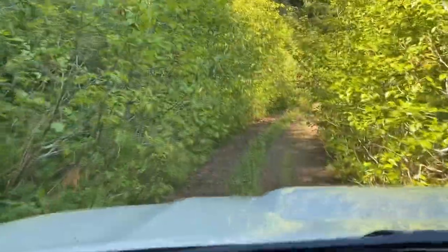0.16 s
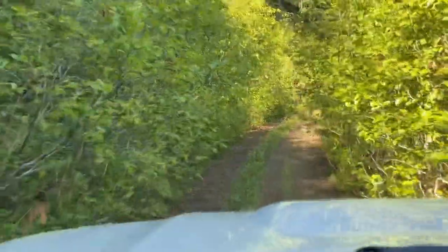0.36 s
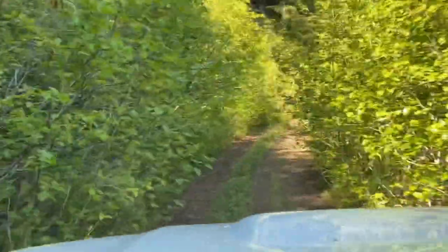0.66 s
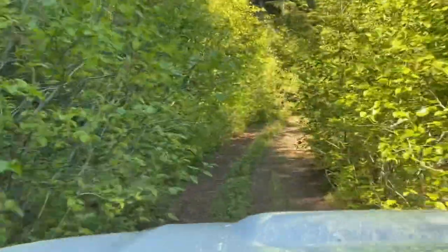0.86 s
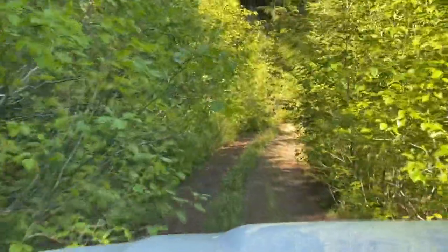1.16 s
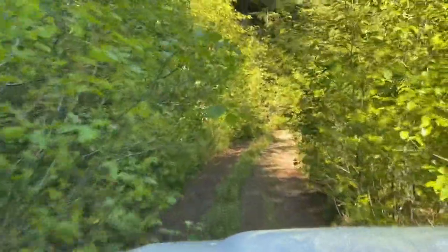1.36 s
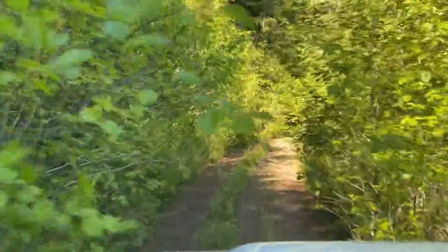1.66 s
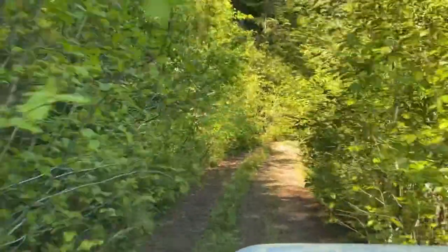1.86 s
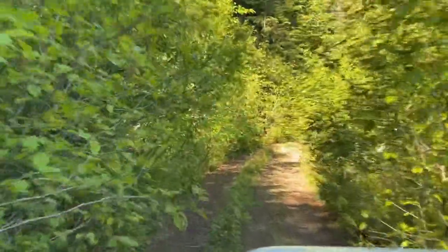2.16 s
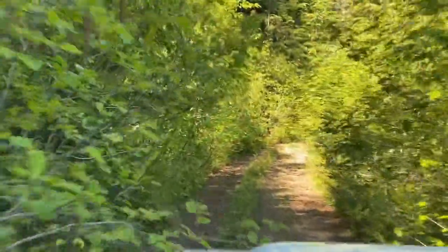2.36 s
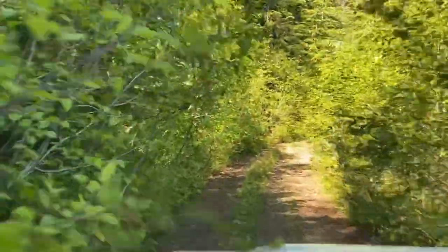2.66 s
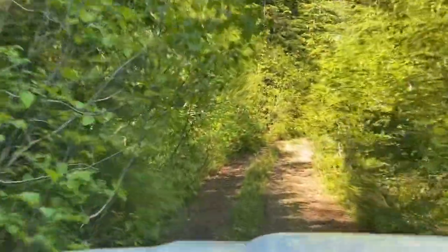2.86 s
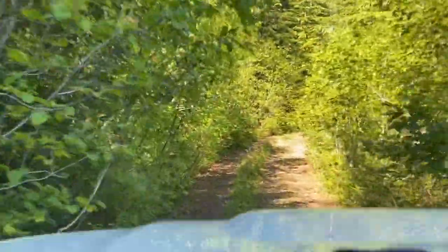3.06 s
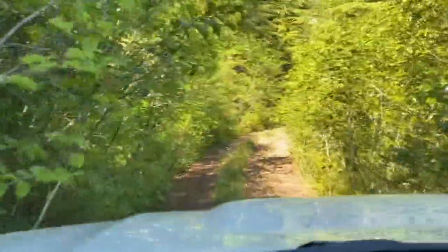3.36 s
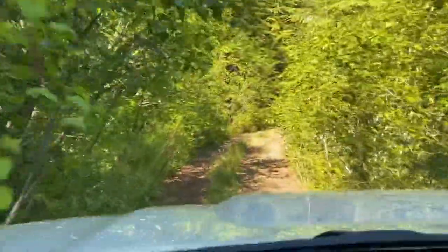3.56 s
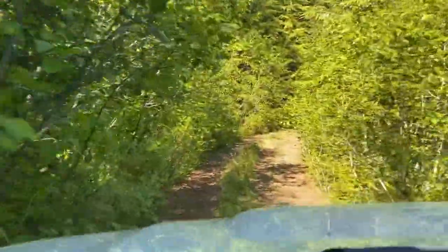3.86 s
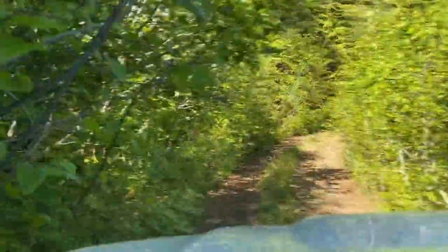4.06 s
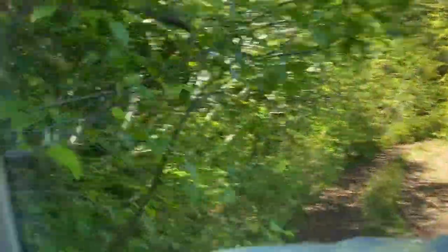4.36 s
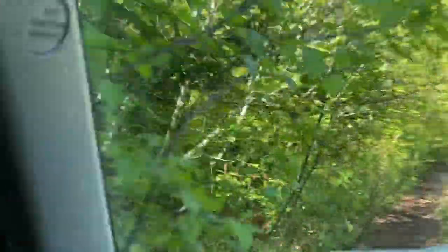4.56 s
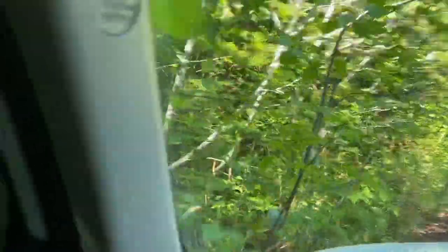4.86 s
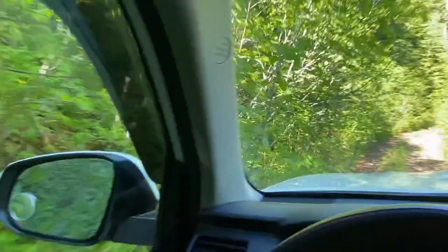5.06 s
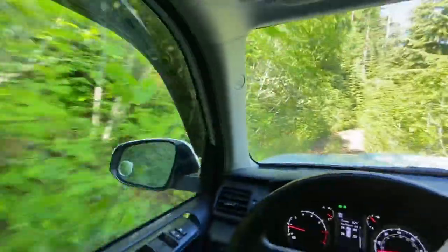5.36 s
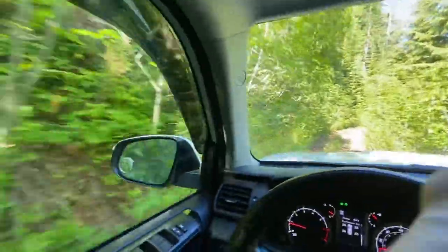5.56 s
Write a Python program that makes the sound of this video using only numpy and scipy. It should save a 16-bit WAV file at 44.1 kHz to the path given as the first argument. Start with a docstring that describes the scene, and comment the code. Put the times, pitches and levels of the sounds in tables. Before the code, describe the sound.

Low booming cab rumble over ruts, quiet engine hum, branches rustling, ticking and knocking on the bodywork, one hard thump late on.

```python
"""A deep, uneven cab boom and dull gravel crunch over a quiet engine, with leaf rustle, twig slaps and knocks.
A four-wheel-drive crawls along an overgrown dirt track, heard from the driver's seat.
Filtered noise makes the tyre rumble, wash and twig contacts; tiny random impacts make stones and foliage;
sine waves make the engine, ruts and ringing body. Near the end the microphone turns to the side window."""
import sys
import numpy as np
from scipy import signal
from scipy.fft import rfft, irfft, next_fast_len
from scipy.io import wavfile
from scipy.ndimage import uniform_filter1d

SR = 44100
rng = np.random.default_rng(int(sys.argv[2]) if len(sys.argv) > 2 else 0)


def generate_wav(sig):
    """Save sig (samples, or channels by samples) to the path in sys.argv[1] as 16-bit PCM at SR."""
    pcm = np.round(np.clip(np.atleast_2d(sig).T, -1, 1) * 32767).astype(np.int16)
    wavfile.write(sys.argv[1], SR, pcm)


N = 251366
FFT_SIZE = next_fast_len(N, True)
BINS = np.fft.rfftfreq(FFT_SIZE, 1 / SR)  # Hz

# Foliage pressing on the body, before layer trims: t/s, stems rubbing level/dB, leaves rustling level/dB
FOLIAGE_PRESSURE = [(0.0, -54, -58), (0.2, -57, -64), (0.4, -45, -53.5), (0.58, -53.5, -65),
                    (0.98, -44.5, -58), (1.64, -49, -68.5), (1.93, -45, -58), (2.37, -56, -48.5),
                    (2.85, -43, -56), (3.0, -51.5, -58), (3.3, -40.5, -53.5), (3.55, -49, -63),
                    (4.0, -45.5, -54), (4.58, -58, -67.5), (4.77, -41, -64.5), (4.99, -53, -77.5),
                    (5.18, -47, -63.5), (5.7, -50, -53.5)]


# In every two-channel source, row 0 is common to both microphone ports and row 1 is what sets them apart.

def tyres(boom_db=1, drum_db=-1, lumpy_db=4.0, heave_db=1.0):
    """The ground shakes the cab through the springs in uneven heaves; stones crunch dully under the tread."""
    # Roughness of the track, before layer trims: t/s, cab boom level/dB, tyre drumming level/dB, gravel level/dB
    ground = [(0.0, -26, -34, -51.5), (0.22, -29, -34, -50.5), (0.55, -27, -32, -39.5),
              (0.75, -30, -38, -42), (1.05, -27.5, -32, -40.5), (1.25, -28.5, -29, -40.5),
              (1.8, -27.5, -32, -38), (2.25, -26.5, -36, -44), (2.45, -30.5, -33.5, -44),
              (2.85, -28, -33, -35), (3.2, -26, -30.5, -45.5), (3.55, -26.5, -37, -45.5),
              (4.05, -28, -30, -32.5), (4.68, -31.5, -34.5, -39), (4.85, -23, -25, -46),
              (5.14, -30.5, -35.5, -39), (5.4, -26.5, -30, -42.5), (5.7, -28, -28.5, -38.5)]
    # Spectrum of the cab boom: f/Hz, relative level per Hz/dB
    boom_spectrum = [(10, -35), (24, -10.5), (33, 2.5), (40, -1), (47, 4.5), (55, 6), (67, 4), (80, -9),
                     (100, -42.5), (200, -82)]
    # Spectrum of the tyre drumming: f/Hz, relative level per Hz/dB
    drum_spectrum = [(40, -35), (65, -15), (80, 7), (97, 1), (114, -5), (135, -0.5), (170, -4.5),
                     (210, -23), (330, -23), (600, -97)]
    # Spectrum of the gravel: f/Hz, relative level per Hz/dB
    gravel_spectrum = [(100, 3.5), (190, 1), (235, 0.5), (275, 5), (345, -0.5), (440, -5), (620, -9),
                       (800, -14.5), (1400, -22.5), (4000, -47)]
    heave = gain_of(heave_db * wander(rate_hz=9.9))
    boom = gain_of(boom_db) * level(ground, axis=1) * rumble(boom_spectrum, steady_s=0.048)
    drum = gain_of(drum_db) * level(ground, axis=2) * rumble(drum_spectrum, steady_s=0.084)
    lumps = gain_of(lumpy_db * wander(rate_hz=6.6))
    stones = colour(cab(grains(per_s=450, spread_db=4), wet_db=-14), gravel_spectrum)
    return heave * (boom + drum) + lumps * level(ground, axis=3) * stones


def rumble(spectrum, steady_s):
    """Random shaking in one band, with its slow swells evened out."""
    x = colour(rng.standard_normal((2, N)), spectrum)
    size = max(int(steady_s * SR), 1)
    power = uniform_filter1d(uniform_filter1d(x ** 2, size), size)
    return x / np.sqrt(abs(power) + 1e-6)


def ruts(skew=0.5, stray=0.089, stray_hz=22.12):
    """A wheel drops into a rut and climbs out: cab and tyre boom for a few cycles, at an unsteady pitch."""
    # Ruts: t/s, length/s, cab boom level/dB, boom f/Hz, tyre drumming level/dB, drumming f/Hz
    rut_rows = [(0.284, 0.18, -20, 57.4, -37, 137), (0.412, 0.13, -17, 53.4, -27.5, 120.7),
                (1.134, 0.12, -24.5, 44.8, -35, 113.5), (1.328, 0.1, -23, 45, -29.5, 98),
                (2.578, 0.11, -28, 66.4, -29, 112.6), (2.869, 0.071, -39, 49, -31, 94),
                (3.05, 0.14, -23, 62.8, -31, 99), (3.617, 0.14, -32, 64.8, -29.5, 143.7),
                (3.85, 0.11, -18, 50, -31, 88.4), (4.251, 0.085, -16, 44.7, -17, 102.5),
                (4.387, 0.2, -15.5, 48.2, -24.5, 105.7), (4.873, 0.063, -20, 62.4, -17, 91.6),
                (4.902, 0.04, -36, 50, -10, 103), (5.419, 0.19, -17, 46.5, -26.5, 79)]
    # Two unsteady clocks make the boom and the drumming stray in pitch separately.
    clocks = [np.cumsum(1 + stray * wander(stray_hz)) / SR for _ in range(2)]
    out = np.zeros(N)
    for s, length, boom_db, boom_hz, drum_db, drum_hz in rut_rows:
        part = slice(round(s * SR), round((s + length) * SR))
        push = arch(s, length, skew)[part]  # skew under 1: the drop is quicker than the climb
        for clock, db, hz in zip(clocks, (boom_db, drum_db), (boom_hz, drum_hz)):
            turns = hz * (clock[part] - clock[part][0]) + rng.random()
            out[part] += gain_of(db) * push * np.sqrt(2) * np.sin(2 * np.pi * turns)
    return out * np.array([[1], [0]])


def knocks(knock_db=-1, rise_cycles=0.4, rattle=0.19, apart_db=-4, apart_turns=0.22,
           trim_db=-2.0, trim_t60=0.15, lowest_db=-15, detune=0.035, size=16384):
    """Bumps and thick branches swell each body mode within about a cycle; loose trim clatters along."""
    # Blows: t/s, level before trims/dB, panel drum relative level/dB, ring length factor, clack relative level/dB
    blows = [(0.286, -24.5, -14, 2.1, -16.5), (0.344, -33, -14, 0.95, -24), (0.417, -36, -7, 0.51, -9),
             (0.432, -16, -8, 0.47, -22), (1.164, -35, 9.5, 0.35, -11), (1.969, -22, 5, 0.84, -18),
             (2.605, -16.5, -0.5, 0.74, -16), (2.721, -25.5, -6, 0.38, -8), (2.817, -26.5, -12, 0.58, -10),
             (3.053, -21, -0.5, 0.4, -17), (3.232, -29.5, -1, 0.59, -11), (3.375, -24, -6, 0.51, -14),
             (3.612, -36.5, 6, 2.2, -12), (3.712, -31, -4, 1.06, -13), (3.846, -16.5, -3.5, 0.47, -20.5),
             (4.105, -24, -1.5, 0.98, -14), (4.2312, -16, 1, .3, -6), (4.242, -2.5, -2, 0.52, -19.5),
             (4.273, -28.5, 13, 1.7, -32), (4.401, -20, 5, 0.52, -15.5), (4.49, -21.5, 0, 0.78, -14),
             (4.803, -27.5, -15, 0.43, -17), (4.851, -10.5, -8, 0.53, -15.5),
             (4.868, -22.5, 4.5, 1.63, -16.5), (5.204, -31.5, 5, 1.4, -8.5), (5.419, -16, -5, 0.58, -10),
             (5.4303, -17, 4, 0.83, -18.5)]
    # What body and cab ring with: f before detuning/Hz, relative level/dB, t60 before the length factor/s
    body_modes = [(48, -8, 0.3), (95.7, 3.5, 0.6), (174.7, -2, 0.25), (232, -1, 0.17), (287.2, -5, 0.15),
                  (326.6, 3.5, 0.14), (365.8, 0, 0.13), (388.5, -5, 0.16), (504, -1.5, 0.044),
                  (557.5, 0.5, 0.18), (625, -12.5, 0.21), (840, 0, 0.14), (1365, -0.5, 0.06)]
    # Spectrum of the loose trim: f/Hz, relative level per Hz/dB
    trim_spectrum = [(150, 12), (300, -11), (390, 17.5), (520, 2.5), (750, -1), (1300, -13.5),
                     (2500, -12.5), (6000, -58)]
    t = np.arange(size) / SR
    out, shaken = np.zeros((2, N)), np.zeros((2, N))
    for s, db, drum_db, length, clack_db in blows:
        tone = [(100, lowest_db), (170, drum_db), (225, drum_db), (300, 0), (380, 0), (520, clack_db)]
        for k, (hz, mode_db, t60) in enumerate(body_modes):
            # Each blow lands on a different spot, which shifts every mode a little.
            angle = 2 * np.pi * hz * (1 + detune * rng.uniform(-0.75, 1)) * t
            shake = rattle * evened(uniform_filter1d(rng.standard_normal(size), size=200))
            # Neighbouring modes swing opposite ways.
            side = np.array([[0], [rng.choice([-1, 1])]])
            start = np.pi * k + 2 * np.pi * apart_turns * side
            ring = swell(t, rise_cycles / hz, t60 * max(length, .2))
            gain = gain_of(knock_db + db + mode_db + read(tone, hz))
            add(out, s, gain * ring * np.sin(angle + start + shake))
        add(shaken, s, gain_of(db + trim_db + .5 * clack_db) * swell(t, 0.00045, trim_t60)[None])
    clatter = shaken * colour(rng.standard_normal((2, N)), trim_spectrum)
    return (out + clatter) * np.array([[1], [gain_of(apart_db)]])


def twigs(slap_db=-1, crack_db=4, crack_t60=0.0071, rise_s=0.0026, leaf_db=-11, leaf_rise_s=0.00086,
          leaf_t60=0.14, leaf_lead_s=0.011, patchy_db=2.0, ring_db=7, ring_width_hz=300, wet_db=-9,
          low_slope=1.2, top_slope=1.53, dry_t60=0.07, size=8192):
    """A twig cracks against the body, chatters on and rings at its own pitch; its leaves swish around it."""
    # Twig contacts on the body, from faint ticks to hard slaps: t/s, level before trims/dB,
    # hollow part relative level/dB, sharp part relative level/dB, chatter t60/s, ring f/Hz
    contacts = [(0.385, -25, -19, -19, 0.053, 1590), (0.4155, -26, -4.5, -2.5, 0.028, 945),
                (0.613, -27, -28, -2, 0.04, 1890), (0.676, -28.5, -5, -6, 0.098, 2580),
                (0.725, -29.5, -14, -8, 0.067, 3800), (0.8296, -26, -20, -8.5, 0.054, 2750),
                (0.901, -30.5, -12, -9.5, 0.057, 4870), (0.957, -19.5, -27, -2.5, 0.055, 3420),
                (0.978, -22.5, -8, -13, 0.1, 4040), (1.032, -24.5, -3, -12, 0.11, 2650),
                (1.139, -29, -1, -5, 0.043, 3640), (1.3714, -23, -5, -8, 0.054, 905),
                (1.508, -30.5, -8, -3, 0.13, 1620), (1.7842, -26.5, -9, -40, 0.062, 2050),
                (1.838, -36, -14, -25, 0.05, 2200), (1.857, -35.5, -18, -3, 0.07, 2600),
                (1.8829, -27.5, -23, -8, 0.1, 2030), (2.0168, -37, -20, 2, 0.012, 5030),
                (2.0564, -27.5, -2, 0.5, 0.063, 2700), (2.1193, -27, -12, 0, 0.019, 5600),
                (2.157, -38, -16, 1, 0.061, 3000), (2.1907, -27, -26.5, 4, 0.036, 2530),
                (2.2353, -20, -13, 3, 0.052, 2500), (2.386, -19.5, -3.5, -8, 0.077, 1310),
                (2.5, -35, -16, -1, 0.05, 5500), (2.559, -21.5, -11, -6.5, 0.035, 2670),
                (2.5705, -23, -7, -10, 0.027, 3140), (2.5895, -20.5, -5, -6.5, 0.045, 1750),
                (2.6266, -32, -22, -9, 0.02, 3300), (2.635, -28, -20, -7, 0.02, 3400),
                (2.645, -28, 3.5, -10, 0.033, 2500), (2.655, -23.5, -8, -5, 0.025, 5070),
                (2.721, -27.5, -0.5, -3, 0.041, 2446), (2.731, -29, -1, -2, 0.087, 2960),
                (3.03, -34, -22, 6, 0.032, 2780), (3.051, -13, -13, -3, 0.078, 2780),
                (3.072, -22.5, -4.5, -14, 0.1, 3100), (3.1698, -30.5, -15, 4.5, 0.042, 2020),
                (3.2, -36.5, -12, -4, 0.1, 3300), (3.245, -22, -11, -8, 0.067, 2860),
                (3.274, -17.5, -4.5, -10, 0.026, 1870), (3.294, -23, -10, -4.5, 0.036, 3120),
                (3.6091, -19.5, -4, -8.5, 0.066, 1090), (3.705, -20.5, -25, -10, 0.043, 2830),
                (3.75, -24, -14, -7, 0.055, 1640), (3.8077, -25, -5.5, -1.5, 0.082, 3280),
                (3.844, -27.5, -14, -0.5, 0.069, 2150), (4.007, -25.5, -22, -1.5, 0.072, 2630),
                (4.132, -30, -17, -5, 0.064, 2750), (4.2195, -21, -19, -9, 0.039, 3000),
                (4.2304, -7.5, 0.5, -11, 0.048, 3720), (4.246, -21, -8, -11, 0.08, 2900),
                (4.3032, -20, -4, 4.5, 0.028, 3260), (4.317, -31, 5, -9, 0.063, 2300),
                (4.357, -33, -14, 0.5, 0.054, 3000), (4.4095, -29, -19, -7.5, 0.028, 2420),
                (4.469, -42.5, -9, -0.5, 0.061, 5900), (4.588, -16.5, -5.5, -3.5, 0.042, 1500),
                (4.602, -38, -11, -12, 0.041, 2200), (4.662, -34, -16, -4.5, 0.062, 3100),
                (4.8504, -35, 9, -17, 0.083, 766), (5.1612, -32.5, -7.5, -7.5, 0.13, 930),
                (5.313, -33, -1, -3, 0.18, 1360), (5.404, -26.5, 1, -2, 0.14, 2680),
                (5.499, -39.5, -22, 0, 0.15, 6450), (5.528, -21.5, -3.5, -2, 0.064, 5400),
                (5.549, -24.5, -4, -2, 0.063, 4670), (5.557, -25, 2.5, -0.5, 0.059, 2340),
                (5.571, -34, 6, -2, 0.025, 2600)]
    # Spectrum shared by all contacts: f/Hz, relative level per Hz/dB
    contact_spectrum = [(100, -51), (400, 11.5), (650, 9), (1000, 7.5), (1700, 3.5), (2800, 1.5), (4200, 0),
                        (5500, 0.5), (7500, -2), (10500, -6), (13000, -13.5), (15500, -10)]
    t, hz, out = np.arange(size) / SR, np.fft.rfftfreq(size, 1 / SR), np.zeros((2, N))
    shared_db = read(contact_spectrum, hz)
    for s, db, hollow_db, sharp_db, t60, ring_hz in list(contacts) + touches():
        fast, slow, patches, *hiss = rng.standard_normal((5, size))
        fast_db = 3.3 * evened(uniform_filter1d(fast, size=36))
        slow_db = 1.3 * evened(uniform_filter1d(slow, size=260))
        chatter = gain_of(fast_db + slow_db)
        # Harder slaps have a stronger crack and less leaf swish; light touches have relatively more leaf.
        force = gain_of(.25 * (db + 25))
        # A twig that chatters only briefly snaps harder against the body.
        hardness = force * max(dry_t60 / max(t60, .015), 1) ** .7
        # The harder a branch strikes, the earlier its leaves reach the body ahead of it.
        lead_s = leaf_lead_s * max(force - 1, 0)
        twig_rise_s = rise_s / hardness
        crack = gain_of(crack_db) * hardness * swell(t - lead_s, twig_rise_s, crack_t60)
        twig = swell(t - lead_s, twig_rise_s, t60) + crack
        leaves = gain_of(leaf_db) / hardness * swell(t, leaf_rise_s, leaf_t60)
        push = np.hypot(twig, leaves)
        noise = evened(np.array(hiss) * chatter * push) * np.sqrt(np.mean(push ** 2))
        # Every spot on the body has its own uneven response.
        smooth = uniform_filter1d(uniform_filter1d(patches[:len(hz)], size=40), size=25)
        patch_db = patchy_db * evened(smooth)
        tone_db = read([(500, low_slope * hollow_db), (1000, hollow_db), (1600, 0.002), (3600, 0),
                        (6000, sharp_db), (13000, top_slope * sharp_db + 0.5)], hz)
        peak_db = ring_db / (1 + ((hz - ring_hz) / ring_width_hz) ** 2)
        response = causal(shared_db + patch_db + tone_db + peak_db)
        add(out, s - lead_s, gain_of(db + slap_db) * irfft(rfft(noise) * response))
    return cab(out, wet_db=wet_db)


def touches(per_s=7.3, touch_db=-35, usual_rustle_db=-58, follows=0.62, hollow_db=-12.5, sharp_db=-11,
            scatter_db=5.5, t60=0.038, low_hz=1050, high_hz=3600, count=150):
    """Thin twigs meet the body at random, harder as leaves press more; columns as in the twig contacts."""
    when, spot, *chance = rng.random((count, 5))[:int(per_s * N / SR) + 1].T
    s = when * N / SR
    force, hollow, sharp = scatter_db * (2 * np.array(chance) - 1)
    times, _, rustle_db = np.transpose(FOLIAGE_PRESSURE)
    # The level follows only a share of the changes in the rustle.
    db = touch_db + follows * (np.interp(s, times, rustle_db) - usual_rustle_db) + force
    ring_hz = low_hz + spot * (high_hz - low_hz)
    return list(zip(s, db, hollow_db + hollow, sharp_db + sharp, np.full(len(s), t60), ring_hz))


def chirps(chirp_db=2, rise_s=0.0014, glide_s=0.0085, size=8192):
    """Short bursts of noise excite one narrow resonance each, which glides quickly to its final pitch."""
    # Short narrow rings, from stems dragging or striking and from body knocks: t/s, level before trim/dB,
    # t60 of the burst/s, start f/Hz, end f/Hz, resonance width in each of two passes/Hz
    ring_rows = [(0.388, -34, 0.084, 1550, 1620, 110), (0.99, -26, 0.049, 1110, 1070, 250),
                 (1.001, -33, 0.11, 1500, 1570, 400), (1.032, -23.5, 0.046, 2700, 2480, 880),
                 (2.561, -22.5, 0.022, 2680, 2450, 500), (2.604, -30, .03, 1800, 1700, 300),
                 (2.646, -26, .025, 2580, 2450, 500), (2.721, -25, 0.019, 2600, 2470, 250),
                 (3.228, -33, .05, 1440, 1400, 200), (4.2308, -14, 0.033, 2920, 2850, 250),
                 (4.2313, -12.5, 0.023, 1350, 1290, 350), (4.234, -15.5, 0.077, 630, 555, 300),
                 (4.303, -27, 0.028, 2420, 2480, 200), (4.589, -17.5, 0.035, 2300, 2263, 225),
                 (4.589, -24, 0.032, 4140, 4050, 400), (4.853, -21.5, 0.038, 820, 780, 200),
                 (5.408, -30.5, .05, 3870, 3980, 180), (5.418, -35, 0.068, 2570, 2600, 150),
                 (5.5282, -22, 0.02, 5500, 5530, 500), (5.531, -26.5, 0.07, 2750, 2600, 600),
                 (5.552, -36, 0.046, 5460, 5600, 900)]
    t, out = np.arange(size) / SR, np.zeros((2, N))
    for s, db, t60, start_hz, end_hz, width_hz in ring_rows:
        hz = end_hz + (start_hz - end_hz) * np.exp(-t / glide_s)
        burst = rng.standard_normal((2, size)) * swell(t, rise_s, t60)
        ring = resonate(resonate(burst, hz, width_hz), hz, width_hz)
        # The ring is scaled to the energy of the burst that drives it.
        matched = ring * np.linalg.norm(burst[0]) / np.linalg.norm(ring, axis=1, keepdims=True)
        add(out, s, gain_of(db + chirp_db) * matched)
    return cab(out, wet_db=-12)


def resonate(x, hz, width_hz):
    """A resonance of gain 1 that follows the curve hz."""
    turn = np.exp(2j * np.pi * np.cumsum(hz) / SR)
    r = np.exp(-np.pi * width_hz / SR)
    # Shift the moving pitch down to zero, smooth there, then shift back up.
    return 2 * (turn * signal.lfilter([1 - r], [1, -r], x / turn)).real


def foliage(rub_db=-1, rustle_db=1, tick_db=-46, tick_growth=0.99, clump_db=2):
    """Stems and leaves stick and slip in clumps; sharp ticks come and go with the pressure of the leaves."""
    # Spectrum of the rubbing stems: f/Hz, relative level per Hz/dB
    rub_spectrum = [(300, -5), (550, 2.5), (850, 5.5), (1300, 5.5), (2000, 2), (2600, -7.5), (3600, -11.5),
                    (8000, -16)]
    # Spectrum of the rustling leaves: f/Hz, relative level per Hz/dB
    rustle_spectrum = [(900, -11), (1900, -10), (2800, -1), (3800, -8.5), (5500, -11.5), (7500, -15),
                       (10000, -15.5), (14000, -29), (15500, -38)]
    # Spectrum of the ticks of leaf edges and thorns: f/Hz, relative level per Hz/dB
    tick_spectrum = [(800, 12), (2000, 7), (3000, -1), (5000, 5.5), (7500, 0), (10000, -6), (14000, -11.5),
                     (15500, -9)]
    clumps = gain_of(clump_db * wander(rate_hz=20))
    stems = cab(scratches(500, 3800, per_s=130, spread_db=4.2, cycles=6, flutter_db=3.5), wet_db=-2)
    leaves = cab(scratches(1900, 9000, per_s=65, spread_db=5.5, cycles=8, flutter_db=4), wet_db=-2)
    ticks = cab(grains(per_s=320, spread_db=5.5), wet_db=5)
    pressure = brushing(rustle_db, axis=2)
    rubbing = brushing(rub_db, axis=1) * colour(stems, rub_spectrum)
    rustling = pressure * colour(leaves, rustle_spectrum)
    ticking = gain_of(tick_db) * evened(pressure ** tick_growth) * colour(ticks, tick_spectrum)
    return clumps * (rubbing + rustling + ticking)


def brushing(steady_db, axis):
    """The foliage's steady pressure in one layer (1 stems, 2 leaves), and one sweep for every bough."""
    # Leafy boughs sweeping along the side: t/s, length/s, stems rubbing level/dB, leaves rustling level/dB
    boughs = [(0.11, 0.07, -45, -53.5), (0.349, 0.021, -46, -41), (0.755, 0.042, -44, -62),
              (1.08, 0.036, -44, -48.5), (1.262, 0.089, -46, -47), (1.484, 0.039, -49, -46),
              (1.625, 0.022, -44.5, -62), (1.933, 0.092, -52, -46), (2.001, 0.13, -48, -47.5),
              (2.165, 0.025, -51, -45), (2.219, 0.026, -50, -38.5), (2.27, 0.048, -45, -44),
              (2.35, 0.053, -33.5, -38), (2.425, 0.052, -62, -54), (2.601, 0.036, -34, -48),
              (2.787, 0.035, -45, -45), (2.88, 0.098, -39.5, -44), (3.324, 0.066, -37, -68),
              (3.4, 0.096, -45.5, -51), (3.671, 0.051, -38, -59), (3.936, 0.016, -38.5, -45),
              (4.027, 0.028, -43, -40), (4.742, 0.06, -40, -58), (5.018, 0.039, -47, -74),
              (5.229, 0.02, -39, -66), (5.682, 0.027, -37, -63)]
    skew = 0.46  # under 1: a bough lands more quickly than it slides off
    sweeps = sum(gain_of(layer_db[axis - 1]) * arch(s, length, skew) for s, length, *layer_db in boughs)
    return np.hypot(gain_of(steady_db) * level(FOLIAGE_PRESSURE, axis=axis), sweeps)


def scratches(low_hz, high_hz, per_s, spread_db, cycles, flutter_db, count=12):
    """Many small contacts, each pitch band ringing for a few cycles and fluttering on its own."""
    out = np.zeros((2, N))
    for hz in np.geomspace(low_hz, min(high_hz, SR / 3), count):
        slips = grains(per_s, spread_db) * gain_of(flutter_db * wander(rate_hz=16))
        out += signal.lfilter(*signal.iirpeak(hz, max(cycles, 2), fs=SR), slips)
    return evened(out)


def engine(waver=0.01205, engine_db=-38.5):
    """A hum of low multiples of the firing rate, wavering with the load and picking up in mid-track."""
    # Engine at low revs: t/s, firing rate before the waver f/Hz
    firing_curve = [(0, 57.34), (0.9, 54.73), (1.6, 57.67), (2.5, 61.1), (3.1, 62.2), (3.9, 57.33),
                    (5.7, 54.9)]
    # Its hum: multiple of the firing rate, relative level/dB
    orders = [(1, 2.5), (2, 1), (3, -16.5), (4, -13)]
    firing_hz = np.interp(np.arange(N) / SR, *np.transpose(firing_curve))
    turns = np.cumsum(firing_hz * (1 + waver * wander(rate_hz=2.61))) / SR
    hum = sum(gain_of(db) * np.sin(2 * np.pi * (round(k) * turns + rng.random())) for k, db in orders)
    return gain_of(engine_db) * evened(hum) * np.array([[1], [0]])


def wash(wash_db=-52):
    """A smooth hush of filtered noise under the shaking, from the vents and the rolling tread."""
    # Spectrum of air and tread in the cab: f/Hz, relative level per Hz/dB
    wash_spectrum = [(150, -1), (330, 6), (480, -3), (700, -8), (1100, -5), (2000, -13.5), (4000, -25),
                     (9000, -39), (15000, -46)]
    return gain_of(wash_db) * colour(rng.standard_normal((2, N)), wash_spectrum)


def cab(pair, wet_db, size=8192):
    """Adds the short, dense tail of a small upholstered cab, made of noise that fades at each pitch."""
    # Fading time of the cab: f/Hz, t60/s
    cab_fade = [(200, 0.31), (1000, 0.034), (3000, 0.072), (8000, 0.049), (15000, 0.061)]
    hz, t, z = signal.stft(rng.standard_normal((2, size)), SR, nperseg=128)
    fade = gain_of(-60 * t / read(cab_fade, hz)[:, None])
    tail = signal.istft(z * fade, SR, nperseg=128)[1]
    # The tail fades in from 2.4 to 7.2 ms.
    tail = tail * np.clip(np.arange(tail.shape[1]) / SR / 0.0048 - .5, 0, 1)
    tail = tail / np.linalg.norm(tail, axis=1, keepdims=True)
    return pair + gain_of(wet_db) * signal.fftconvolve(pair, tail, axes=1)[:, :N]


def ports(pair, turn_s=4.98, turn_fade_s=0.012, side_lag_s=0.00033):
    """The microphone first faces ahead; once turned, sound from the side window reaches the left port first."""
    # Likeness of the two ports for sound from ahead: f/Hz, correlation
    ahead_likeness = [(50, 0.99), (130, 0.99), (290, 0.6), (640, 0.32), (1400, 0.038), (2200, 0.84),
                      (3100, 1), (7000, 1), (15000, 0.86)]
    # Phase by which the left port leads for sound from ahead: f/Hz, lead/turns
    ahead_lead = [(0, 0), (350, .02), (1050, .13), (1450, -.18), (2200, .03), (3000, .06), (5000, .02),
                  (7100, -.03), (8000, -.25), (8550, -.5), (9400, -.87), (10600, -1.05), (11600, -1.42),
                  (12400, -1.53), (13400, -1.95), (14200, -2.03), (15500, -2.45), (17000, -2.6)]
    # Likeness of the two ports for sound from the side window: f/Hz, correlation
    aside_likeness = [(50, 0.96), (130, 0.99), (500, 0.072), (2200, 0.47), (3500, 0.049), (15000, .05)]
    # Colour of sound from the side window: f/Hz, level/dB
    aside_colour = [(300, -1.5), (1300, 3.5), (3800, 1), (5500, 5), (7000, 1.5), (11000, -1.5), (14000, -2)]
    spectra = rfft(pair, FFT_SIZE)
    ahead = port_pair(spectra, ahead_likeness, np.interp(BINS, *np.transpose(ahead_lead)))
    aside = port_pair(spectra * gain_of(read(aside_colour, BINS)), aside_likeness, BINS * side_lag_s)
    turned = np.clip((np.arange(N) / SR - turn_s) / turn_fade_s, 0, 1)
    return (1 - turned) * ahead + turned * aside * gain_of([[-.3], [.4]])  # left and right, dB


def port_pair(spectra, likeness, turns):
    """Left and right from a common and an unrelated signal, the left leading by some turns of phase."""
    same = np.clip(read(likeness, BINS), 0, .999)
    common, apart = spectra * np.sqrt([(1 + same) / 2, (1 - same) / 2])
    lead = np.exp(1j * np.pi * turns)  # half of the phase lead goes to each port
    return irfft(np.array([(common + apart) * lead, (common - apart) / lead]), FFT_SIZE)[:, :N]


def grains(per_s, spread_db, count=6000):
    """A random train of tiny impacts, mostly small, a few large."""
    when, force, left, right = rng.random((count, 4))[:int(per_s * N / SR) + 1].T
    size = gain_of(spread_db * np.minimum(-np.log(1 - force), 3))
    out = np.zeros((2, N))
    out[:, (when * N).astype(int)] = size * np.sign([left - .5, right - .5])
    return evened(out)


def swell(t, rise_s, t60):
    """An envelope that rises from time zero and dies away by 60 dB in t60 seconds."""
    t = np.maximum(t, 0)
    return (1 - np.exp(-t / rise_s)) * np.exp(-np.log(1000) * t / max(t60, .005))


def arch(s, length, skew):
    """One lopsided swell of height 1, from time s."""
    return np.sin(np.pi * np.clip((np.arange(N) / SR - s) / length, 0, 1) ** skew)


def wander(rate_hz):
    """Slow chance of rms 1: straight lines between random points, two for each cycle of rate_hz."""
    knots = np.arange(N) * rate_hz * 2 / SR
    return evened(np.interp(knots, np.arange(2048), rng.standard_normal(2048)))


def colour(x, spectrum):
    """Gives a steady sound a spectrum, at rms 1."""
    return evened(irfft(rfft(x, FFT_SIZE) * gain_of(read(spectrum, BINS)), FFT_SIZE)[:, :N])


def causal(db):
    """Frequency response with these gains that rings only after its cause (minimum phase)."""
    log_gain = np.log(gain_of(np.concatenate([db, db[-2:0:-1]])))
    return np.exp(np.conj(signal.hilbert(log_gain)))[:len(db)]


def level(table, axis):
    """One dB column of a curve table as a gain for every sample."""
    rows = np.array(table)
    return gain_of(np.interp(np.arange(N) / SR, rows[:, 0], rows[:, axis]))


def read(points, hz):
    """A table's value at hz, on a logarithmic frequency axis."""
    f, value = np.transpose(points)
    return np.interp(np.log(hz + 1), np.log(f + 1), value)


def add(mix, s, sound):
    """Mixes a sound in at time s."""
    part = mix[:, max(round(s * SR), 0):][:, :sound.shape[1]]
    part += sound[:, :part.shape[1]]


def evened(x):
    """Scales to rms 1."""
    return x / np.sqrt(np.mean(x ** 2) + 1e-20)


def gain_of(db):
    """Turns decibels into a factor."""
    return 10 ** (np.asarray(db) / 20)


def scene():
    """All sources add up and reach the two microphone ports."""
    ground = tyres() + ruts()
    steady = engine() + wash()
    plants_and_rings = foliage() + twigs() + chirps()
    return ports(ground + steady + plants_and_rings + knocks())


def record(dry, ceiling=0.92, edge_hz=15900):
    """A soft ceiling rounds off the loudest peaks, and a low-pass filter limits the band."""
    held = dry / (1 + (dry / ceiling) ** 8) ** (1 / 8)
    low_pass = signal.firwin(255, edge_hz, window=("kaiser", 9), fs=SR)
    return signal.oaconvolve(held, low_pass[None], "same")


dry = scene()
out = record(dry)
generate_wav(out)
```